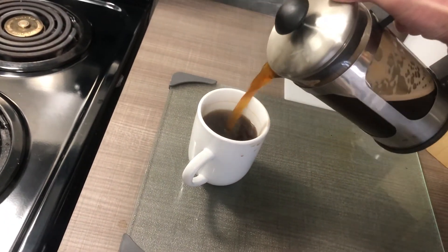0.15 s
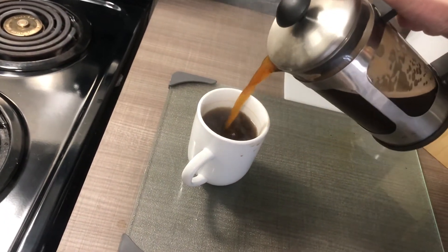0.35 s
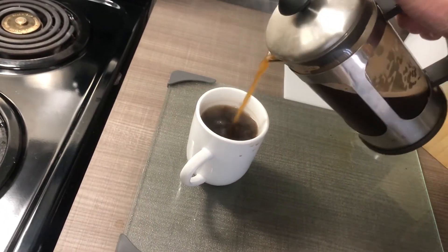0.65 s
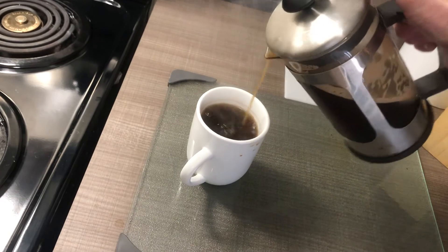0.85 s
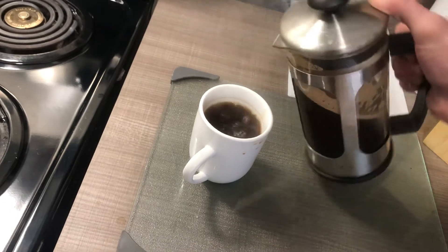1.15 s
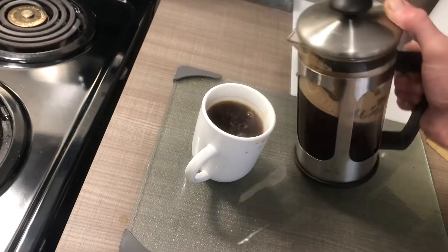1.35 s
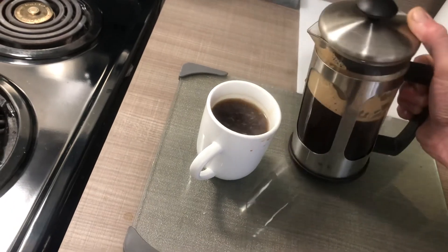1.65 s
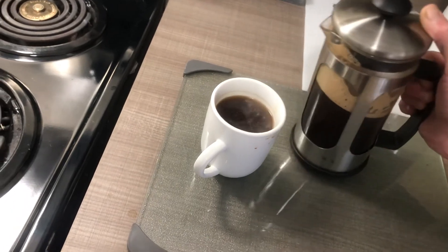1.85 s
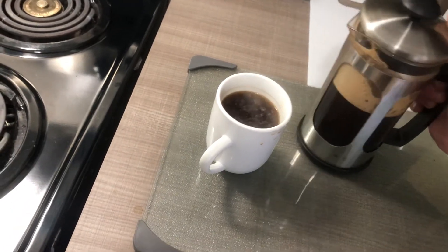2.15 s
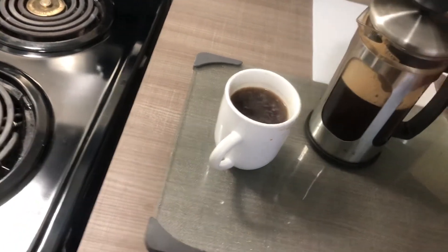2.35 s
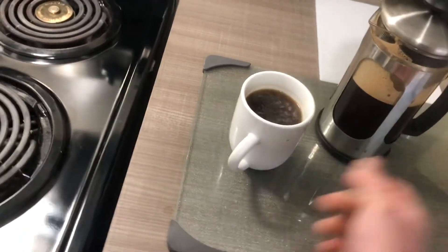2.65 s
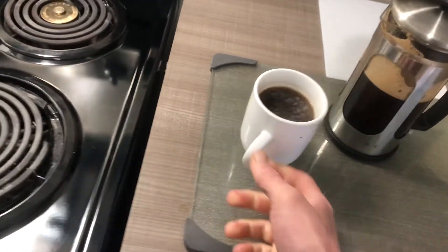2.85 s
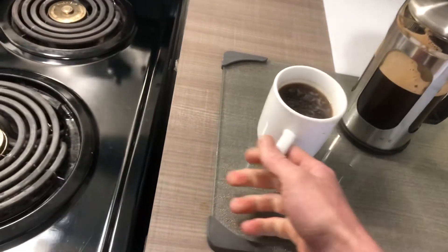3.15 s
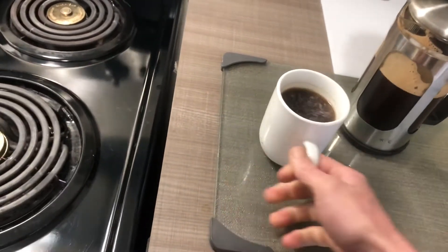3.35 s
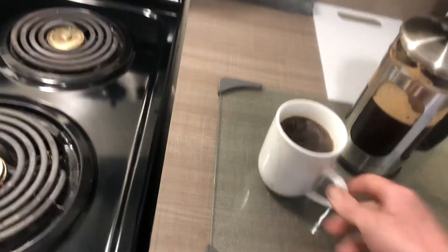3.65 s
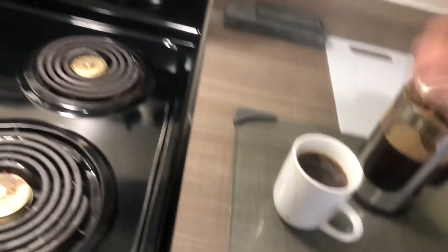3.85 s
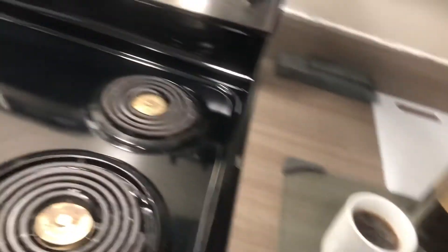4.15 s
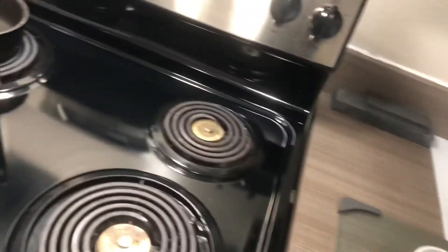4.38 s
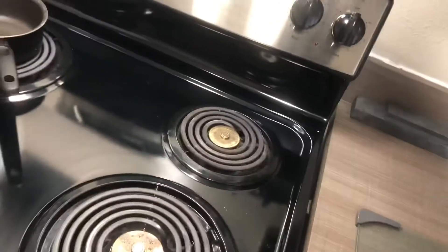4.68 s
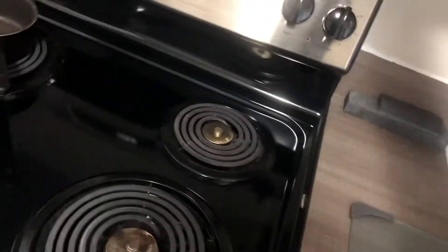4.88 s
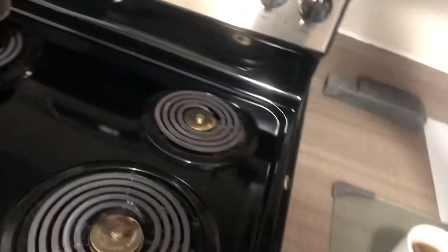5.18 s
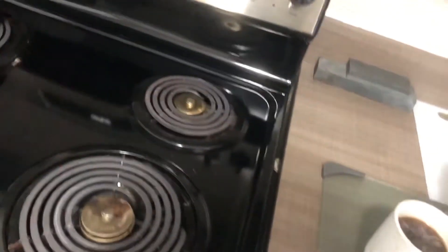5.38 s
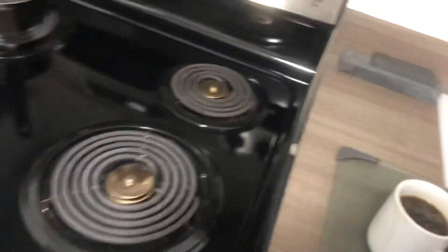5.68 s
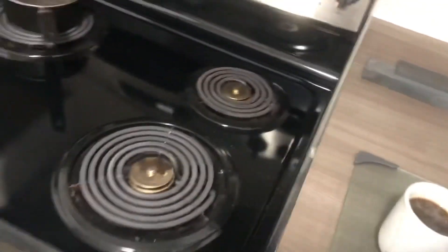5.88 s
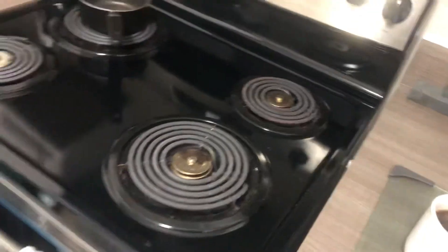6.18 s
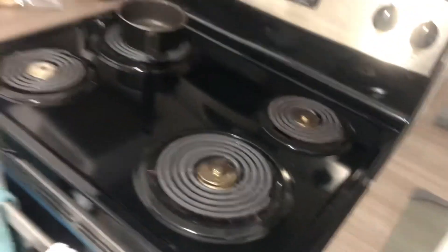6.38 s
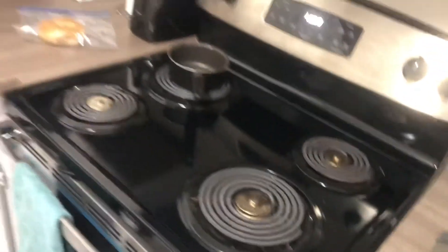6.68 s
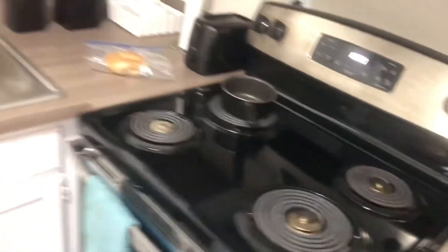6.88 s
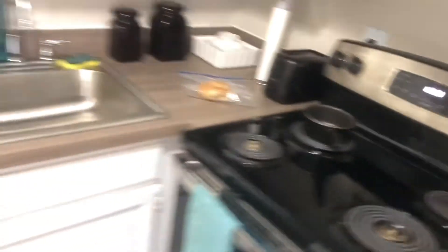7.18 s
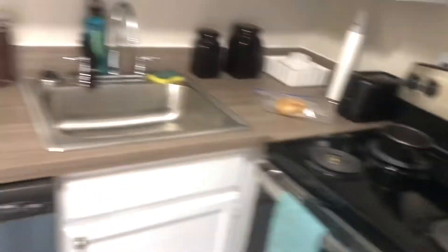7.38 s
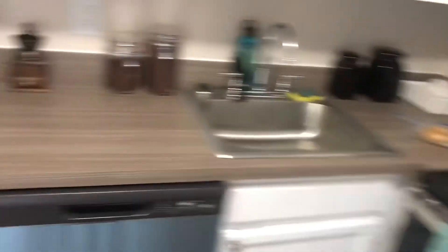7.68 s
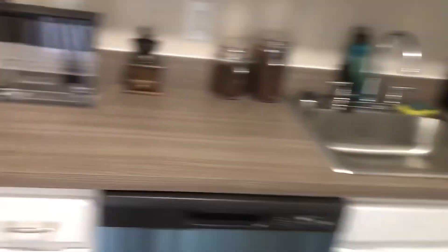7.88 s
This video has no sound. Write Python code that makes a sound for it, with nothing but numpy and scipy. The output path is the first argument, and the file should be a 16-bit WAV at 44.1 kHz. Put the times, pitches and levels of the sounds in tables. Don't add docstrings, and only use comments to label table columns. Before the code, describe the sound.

Coffee trickles and fizzes into a china mug, a heavy pot rocks onto glass, then small creaks, one sharp slap and two dull thuds.

```python
import sys
import numpy as np
from scipy import signal
from scipy.io import wavfile

SR = 44100
rng = np.random.default_rng(int(sys.argv[2]) if len(sys.argv) > 2 else 0)


def volts(x):
    e = np.asarray(x, float) / 20
    return 10 ** e


def log_audio(samples):
    frames = np.atleast_2d(samples).T
    limited = np.clip(frames, -1, 1)
    pcm = np.round(limited * 32767).astype(np.int16)
    wavfile.write(sys.argv[1], SR, pcm)


N = 354123

# time in seconds, level in dB.
HUM = [(0, -60.5), (1.4, -59.5), (3, -61), (5, -62), (6.2, -63.5), (6.6, -68.5), (7.1, -67), (7.5, -72),
       (8.03, -86)]
# frequency in Hz, density in dB per Hz.
AIR = [(12, -49), (20, -21.5), (69, -4), (96, -5.5), (124, -8), (169, -6), (314, -13), (416, -12),
       (863, -21), (2120, -25.5), (2810, -31.5), (3830, -29), (10800, -36), (15200, -37), (16500, -54)]
BAND_EDGES_HZ = 20 * 2 ** np.arange(0, 10.5, .5)
# frequency in Hz, t60 in seconds.
KITCHEN_DECAY = [(100, 0.54), (300, 0.6), (800, 0.6), (2000, 0.48), (5000, 0.47), (9000, 0.28),
                 (14000, 0.089)]

# strongest at in seconds, swell in seconds, fade in seconds,
# lift over the air in dB, tilt in dB per octave.
MOVES = [(.835, 0.022, 0.1, 16.5, 0.5), (1.05, 1.2, 0.22, -21, 15.5), (2.0, 0.11, 0.033, -10, -2),
         (2.25, 0.14, 0.11, 8.5, 1.5), (3.29, 0.18, 0.15, 5.5, -0.5), (3.9, 0.093, 0.35, -2, -2),
         (4.1, 0.26, 0.25, 4.5, 4), (4.25, 0.18, 0.1, -19, -8), (4.55, 0.096, 0.36, 2.5, -3),
         (4.9, 0.14, 0.1, 15.5, 1.5), (5.05, 0.15, 0.14, 2, 3), (5.3, 0.68, 0.21, 3.5, 0),
         (5.82, 0.35, 0.52, 3.5, -1), (6.02, 0.19, 0.042, 3, -1), (6.38, 0.098, 0.19, 13, 1),
         (6.62, 0.19, 0.11, 10.5, 4.5), (6.96, 0.48, 0.15, 3.5, 0.5), (7.16, 0.23, 0.11, 9.5, 0.5),
         (7.36, 0.064, 0.13, 14, 1), (7.62, 0.024, 0.31, 9, -1.5), (7.698, 0.029, 0.071, 21, 5.5),
         (7.82, 0.34, 0.13, 15.5, 3), (7.96, 0.08, .2, 10, -1.5)]
MOVE_CENTRE_HZ, MOVE_BEND_DB = 2000, 1.04

# start in seconds, peak in dB, tilt in dB per octave,
# contact t60 in seconds, echoes in dB.
STEPS = [(2.05, -51.5, 6, 0.063, -1), (3.639, -45.5, 5, 0.1, -25), (4.385, -40.5, 1, 0.093, -0.5),
         (4.394, -38.5, -0.5, 0.18, 10), (5.606, -46, -5, 0.036, -20), (5.863, -47.5, 7, 0.071, 13),
         (6.298, -44.5, 4, 0.044, -21), (6.352, -50, 3, 0.065, -15), (7.12, -40, 11, 0.022, -10),
         (7.13, -37, -4.5, 0.023, -17.5), (7.259, -34.5, -2, 0.0058, -56), (7.317, -41.5, -4, 0.14, -13),
         (7.9, -43, -0.5, 0.67, 4), (7.92, -48, -1, 0.24, -4), (6.91, -45.5, -14.5, 0.048, -19)]
# frequency in Hz, density in dB per Hz.
STEP_COLOUR = [(60, -11), (260, -3), (400, -5.5), (750, -4), (1200, -9.5), (3600, -22), (6200, -28),
               (15000, -45.5)]
# start in seconds, peak in dB.
HEELS = [
    (7.131, -42),
    (7.318, -53),
]

# start in seconds, peak in dB, pitch in Hz, t60 in seconds.
PINGS = [(1.157, -63.5, 3050, 0.043), (2.733, -50.5, 4340, 0.17), (2.762, -52.5, 2590, 0.11),
         (2.979, -52, 7440, 0.14), (3.64, -47, 2450, 0.023), (3.902, -51.5, 2100, 0.13),
         (3.936, -51.5, 5680, 0.12), (3.998, -55, 2300, 0.032), (4.41, -48.5, 6040, 0.086),
         (4.457, -49, 3990, 0.094), (4.885, -46, 2000, 0.16), (5.461, -55.5, 1590, 0.14),
         (5.638, -48.5, 1660, 0.15), (5.642, -52, 1900, 0.53), (5.72, -55.5, 1874, 0.65),
         (5.866, -57, 2500, 0.04), (6.22, -56, 2300, 0.096), (6.68, -51, 2570, 0.028),
         (6.826, -49, 2790, 0.081)]
# start in seconds, peak in dB, centre in Hz.
TICKS = [(2.1797, -41, 3560), (2.215, -62, 5000), (2.26, -55, 5000), (2.308, -53, 3870), (2.336, -57, 5000),
         (2.7263, -49, 4170), (2.9784, -53, 7700), (3.124, -53.5, 3900), (3.187, -54, 3900),
         (3.218, -57, 5400), (3.218, -67, 10000), (3.323, -57, 3700), (4.388, -58, 14000),
         (4.409, -51, 11000), (4.456, -58, 11000), (6.442, -50, 5200), (3.6376, -63, 6400),
         (3.647, -43.5, 3980), (3.652, -65, 5450), (3.892, -56, 7840), (3.934, -51, 5640),
         (5.221, -50, 5800), (5.3762, -57, 13500), (5.381, -55, 4780), (5.5218, -62, 14000),
         (5.7019, -64, 5520), (5.8626, -53, 5600), (6.169, -53, 5260), (6.222, -52, 7660),
         (6.246, -46.5, 4500), (6.455, -50, 4470), (6.873, -58, 6530), (8.0207, -45.5, 4900)]
TICK_T60_S = 0.051
# strongest at in seconds, swell in seconds, fade in seconds,
# level in dB.
MUG_JERKS = [
    (3.125, 0.0084, 0.074, -71),
    (3.225, 0.013, 0.029, -59.5),
    (3.27, 0.017, 0.017, -67),
    (3.315, 0.032, 0.03, -62.5),
    (3.5, 0.19, 0.072, -75),
    (5.06, 0.012, 0.063, -67),
]
# frequency in Hz, width in Hz, level in dB.
CHINA = [(2230, 23, 0), (2580, 50, 5.5), (3300, 56, 3), (3850, 52, 9), (4450, 38, 5), (4800, 70, -7),
         (5370, 59, 6), (6100, 90, -14), (7060, 46, -22), (7700, 76, -7), (10000, 150, -26)]

# start in seconds, peak in dB, tilt in dB per octave, contact t60 in seconds, echoes in dB.
SLAP = [
    (4.6855, -13, 2, 0.075, -7.5),
    (4.704, -28.5, -4.5, 0.078, -14),
]
# frequency in Hz, density in dB per Hz.
SLAP_COLOUR = [(35, -52), (60, -33), (252, -6), (486, -22), (983, 3.5), (1080, -18), (1330, -5),
               (2520, -12), (3420, -13.5), (14700, -23.5), (16500, -34)]
# frequency in Hz, level in dB, t60 in seconds.
SLAPPED_MODES = [(257, -5.5, 0.34), (544, -7, 0.32), (748, -10, .3), (983, 8.5, 0.17), (1745, 2, 0.25),
                 (1314, 2, 0.36), (2013, 11, 0.066)]
# start in seconds, peak in dB, tilt in dB per octave,
# contact t60 in seconds, echoes in dB.
THUDS = [
    (6.3932, -22, -0.5, 0.019, -23.5),
    (6.4512, -24.5, -0.5, 0.011, -30),
]
# frequency in Hz, density in dB per Hz.
THUD_COLOUR = [(29, -44), (50, -22), (85, 7), (313, -7.5), (520, 0), (586, -24), (842, 2), (1100, -17),
               (1580, -7), (2880, -25), (4600, -33), (16000, -82)]
# frequency in Hz, level in dB, t60 in seconds.
PANEL_MODES = [(85, -4.5, 0.23), (138.6, -9, 0.18), (182.4, -2.5, 0.21), (299, -18, 0.17), (486, -7.5, 0.4),
               (517, -1, 0.23), (811, -2, 0.3), (1284, -8, .15), (4600, -20, 0.045), (891.6, -1.5, 0.27),
               (972, 2, 0.097), (1593, 2.5, 0.052), (2100, -7, 0.057), (3120, -14, 0.065)]

# start in seconds, peak in dB, tilt in dB per octave,
# contact t60 in seconds, echoes in dB.
KNOCKS = [
    (1.4815, -13.5, -3, 0.042, -20),
    (1.6455, -19, -7.5, 0.058, -20.5),
    (1.7025, -25.5, -10.5, 0.033, -24.5),
    (2.13, -21.5, -9, 0.046, -15.5),
]
# start in seconds, peak in dB, tilt in dB per octave,
# contact t60 in seconds, echoes in dB.
REBOUNDS = [
    (1.4864, -20.5, -3, .02, -24),
    (1.495, -25.5, 0, 0.034, -25),
    (1.661, -41, 1, .03, -36),
    (2.137, -35.5, 4.5, 0.036, -39),
]
# frequency in Hz, density in dB per Hz.
KNOCK_COLOUR = [(35, -48.5), (90, -39), (153, -13), (250, -22.5), (408, -9.5), (579, -13.5), (666, -7.5),
                (1090, -4), (1310, -14), (1600, -0.5), (2200, -7.5), (3850, -17), (16000, -44.5)]
# frequency in Hz, level in dB, t60 in seconds.
BOARD_MODES = [(627, -5.5, 0.26), (704, -7.5, .2), (1127, -0.5, .2), (898, 0.5, 0.18), (1073, -3, 0.083),
               (1408, 9.5, 0.083), (1550, 12.5, 0.039), (2000, -14, 0.037)]
# frequency in Hz, level in dB, t60 in seconds.
COUNTER_MODES = [(166, 2, 0.1), (317, -8, 0.22), (398.8, -3, 0.21)]
# frequency in Hz, level in dB, t60 in seconds.
SETTLING_MODES = [(198, -1.5, 0.1), (403, -6.5, 0.11), (1390, -2.5, 0.055), (888, -4, 0.08)]
STRIKE_SPREAD_DB = 1.2

# time in seconds, force in dB.
STREAM = [(0, -60.5), (.2, -71), (.4, -66), (.55, -69), (.75, -52.5), (.9, -66.5), (1.0, -107), (1.6, -130)]
# frequency in Hz, width in Hz, level in dB.
MUG = [(424, 28, -11), (1370, 210, -6), (1770, 200, 2.5), (2300, 290, -4)]
# strongest at in seconds, swell in seconds, fade in seconds, level in dB.
GLUGS = [
    (.03, 0.035, 0.024, -57),
    (.24, 0.066, 0.027, -64.5),
    (.37, 0.046, 0.036, -59.5),
    (.63, 0.031, 0.035, -57.5),
    (.82, 0.073, 0.05, -52),
]
# start in seconds, peak in dB, pitch in Hz.
BUBBLES = [(0.0034, -34.5, 1370), (.045, -47, 2300), (.069, -49, 1750), (.113, -50, 1590),
           (.392, -50, 1770), (.482, -50, 1870), (0.701, -39, 2250), (.643, -44, 2300), (0.1364, -46, 2330),
           (0.145, -46, 2350), (0.179, -43, 1770), (0.191, -44, 2330), (0.2148, -43, 1480),
           (0.2464, -43, 2100), (0.258, -33, 1666), (0.319, -43.5, 2300), (0.3496, -34, 1770),
           (0.553, -49, 2440), (0.5755, -38, 2300), (0.608, -28.5, 1504), (0.681, -36, 2300),
           (0.729, -29, 1506), (0.7615, -27, 1950), (0.797, -26.5, 1620), (0.823, -23.5, 1370),
           (0.892, -40, 1315)]
# start in seconds, peak in dB, centre in Hz.
DROPS = [(0.0034, -25.5, 12900), (.0195, -42, 7950), (.1035, -48, 13000), (0.1531, -46, 14000),
         (.161, -44, 14500), (0.174, -40, 13500), (.189, -53, 10000), (.1975, -45, 13500),
         (.208, -47, 8500), (.2155, -36, 14000), (.241, -45, 10500), (.2455, -38, 13400),
         (.264, -43, 13600), (.2885, -43, 8460), (.301, -41, 8000), (.3282, -35, 14100), (.350, -43, 7500),
         (.367, -47, 11000), (.374, -48, 7900), (.4465, -59, 12500), (.4525, -52, 7400),
         (.4975, -51, 14000), (.558, -47, 13000), (.709, -37, 10500), (.855, -44, 10000),
         (0.932, -45, 8500), (.985, -49, 14500), (1.067, -47, 6300), (1.374, -54, 12000),
         (0.2164, -34, 8600), (0.2508, -33, 14400), (0.2915, -35, 14200), (0.3006, -37, 14000),
         (0.331, -38, 8400), (0.349, -36, 13900), (0.527, -39, 14800), (0.608, -43.5, 6740),
         (0.6733, -37, 14200), (0.7032, -32, 7400), (0.755, -36, 5500), (0.772, -36, 11600),
         (0.793, -30, 10300), (0.8236, -19.5, 10700), (0.8239, -19, 3970), (.8395, -38, 11000),
         (0.8636, -30.5, 11200), (0.8937, -18, 9700), (0.9374, -32, 12400), (1.051, -35, 13700),
         (1.066, -34, 12600), (1.127, -40, 14300), (1.2274, -41, 13300), (1.268, -42, 9200),
         (1.311, -42, 15000), (1.4157, -45, 9500), (1.46, -47, 7800)]
# start in seconds, peak in dB, centre in Hz, t60 in seconds.
SPRAY = [
    (.658, -54, 5770, 0.14),
    (.704, -47, 7400, 0.24),
    (.756, -43, 5500, 0.098),
    (.824, -38.5, 4600, 0.23),
    (.894, -45.5, 4560, 0.39),
    (.005, -52, 3650, 0.17),
]
SMALL_BUBBLES_PER_S, FOAM_TICKS_PER_S = 200, 140
FOAM_DB, FOAM_FOLLOWS, FOAM_SETTLES_DB_PER_S, FOAM_GONE_S = -70, 0.41, 21, 1.7
BUBBLE_T60_S, BUBBLE_KNEE_HZ = 0.055, 2300
DRIPS_DB, DRIPS_SPREAD_DB = 11.5, 3
DRIPS_LOW_HZ, DRIPS_HIGH_HZ, DRIPS_END_S = 1000, 2570, .93
DROP_T60_S = .014

POUR_ROOM_DB, POT_ROOM_DB, PANEL_ROOM_DB, SMALL_ROOM_DB = -16, -12.5, -10.5, -11


def rms_one(x):
    return x / np.sqrt(np.mean(x ** 2) + 1e-20)


def in_time(rows):
    s, *columns = np.transpose(rows)
    return [np.interp(np.arange(N) / SR, s, c) for c in columns]


def at_hz(points, hz):
    point_hz, value = np.array(points).T
    return np.interp(np.log(hz), np.log(point_hz), value)


def band(x, low_hz, high_hz):
    edges_hz = [low_hz, min(high_hz, .45 * SR)]
    return signal.sosfilt(signal.butter(2, edges_hz, "band", fs=SR, output="sos"), x)


def drift(rate_hz):
    r = np.exp(-80 * np.pi * rate_hz / SR)
    noise = rng.standard_normal(N // 40 + 2002)
    slow = signal.lfilter([1], [1, -2 * r, r * r], noise)[2000:]
    return np.interp(np.arange(N) / 40, np.arange(len(slow)), rms_one(slow))


def ring(x, hz, t60_s):
    r, w = volts(-60 / (t60_s * SR)), 2 * np.pi * hz / SR
    return signal.lfilter([0, np.sin(w)], [1, -2 * r * np.cos(w), r * r], x + 1e-18)


def add(out, s, db, sound):
    i = round(s * SR)
    out[i:i + len(sound)] += (volts(db) * sound / np.abs(sound).max())[:N - i]


def dying(t60_s, size=16384):
    return rng.standard_normal(size) * volts(-60 * np.arange(size) / SR / max(t60_s, .001))


def swells(rows, gains):
    t = np.arange(0, N + 64, 64) / SR
    bells = []
    for s, up_s, down_s, *_ in rows:
        width_s = np.where(t < s, max(up_s, .003), max(down_s, .003))
        bells.append(np.exp(-2 * ((t - s) / width_s) ** 2))
    return [np.interp(np.arange(N) / SR, t, power) for power in gains ** 2 @ np.array(bells)]


def grains(per_s, spread_db):
    out, at = np.zeros(N), np.flatnonzero(rng.random(N) < per_s / SR)
    size, sign = rng.random((len(at), 2)).T
    out[at] = volts(spread_db * np.minimum(-np.log(size + 1e-9), 4)) * np.sign(sign - .5)
    return out


def tones(table, rise, rough, size=8192):
    out, t, table = np.zeros(N), np.arange(size) / SR, list(table)
    flutters = band(rng.standard_normal((len(table), size)), 40, 190)
    for (s, db, hz, t60_s), flutter in zip(table, flutters):
        sine = np.sin(2 * np.pi * hz * (t + rise * t ** 2))
        add(out, s, db, (1 + rough * rms_one(flutter)) * sine * volts(-60 * t / t60_s))
    return out


def ticks(table, octaves, snap=0.0, size=4096):
    out, click = np.zeros(N), np.arange(size) == 0
    for s, db, hz, t60_s in table:
        burst = dying(t60_s, size=size) + snap * click
        add(out, s, db, band(burst, hz / 2 ** octaves, hz * 2 ** octaves))
    return out


def noise_bands():
    white = rng.standard_normal((2, N))
    pairs = zip(BAND_EDGES_HZ, BAND_EDGES_HZ[1:])
    return [(min(np.sqrt(a * b), 15000), band(white[k % 2], a, b)) for k, (a, b) in enumerate(pairs)]


def kitchen(x):
    t, edges_hz = np.arange(SR) / SR, 60 * 2 ** np.arange(0, 8.6, .5)
    echoes = np.zeros(SR)
    for a, b in zip(edges_hz, edges_hz[1:]):
        t60_s = at_hz(KITCHEN_DECAY, np.sqrt(a * b))
        echoes += band(rng.standard_normal(SR), a, b) * volts(-60 * t / t60_s)
    echoes = echoes * (1 - np.exp(-(t / 0.0046) ** 2))
    return signal.fftconvolve(x, echoes / np.sqrt(np.sum(echoes ** 2)))[:N]


def fridge_hum():
    level_db, = in_time(HUM)
    turns = np.cumsum(120.9 + 0.43 * drift(2.74)) / SR
    return np.sqrt(2) * volts(level_db + 2.5 * drift(2.9)) * np.sin(2 * np.pi * turns)


def air_and_movement(bands, air_db, patchy_db, handling_db):
    *_, lift_db, tilt_db = np.transpose(MOVES)
    octaves = np.log2([[hz / MOVE_CENTRE_HZ] for hz, _ in bands])
    motion = swells(MOVES, volts(lift_db + tilt_db * octaves - MOVE_BEND_DB * octaves ** 2))
    out, hand = np.zeros(N), drift(3.1)
    for (hz, noise), lift in zip(bands, motion):
        level_db = air_db + at_hz(AIR, hz) + patchy_db * drift(36) + handling_db * hand * (hz < 200)
        out += volts(level_db) * np.sqrt(1 + lift) * noise
    return out


def blows(hits, colour, bands, rise_turns):
    out, t, bands = np.zeros(N), np.arange(SR // 2) / SR, bands[3:]
    hz = np.array([[hz] for hz, _ in bands])
    rise = 1 - np.exp(-(t * hz / rise_turns) ** 2)
    echoes = volts(-60 * t / at_hz(KITCHEN_DECAY, hz))
    for s, db, tilt_db, t60_s, echoes_db in hits:
        noise = np.array([np.resize(v[round(s * SR):][:len(t)], len(t)) for _, v in bands])
        fall = volts(-60 * t / max(t60_s, .002)) + volts(echoes_db) * echoes
        gain = volts(at_hz(colour, hz) + tilt_db * np.log2(hz / 1000))
        add(out, s, db, np.sum(gain * rise * fall * noise, axis=0))
    return out


def struck(hits, modes, body_db, late_turns, rattle, low_hz=65):
    out, n = np.zeros(N), np.arange(16384)
    for s, db, *_ in hits:
        strength_db = rng.normal(0, STRIKE_SPREAD_DB, len(modes))
        body = []
        for (hz, level_db, t60_s), change_db in zip(modes, strength_db):
            push = np.exp(-(n * hz / SR - late_turns) ** 2 * 20) * hz
            body.append(volts(level_db + change_db) * ring(push, hz, t60_s))
        flutter = 1 + rattle * rms_one(band(rng.standard_normal((len(modes), len(n))), 10.0, 50))
        add(out, s, db + body_db, band(np.sum(flutter * body, axis=0), low_hz, 9800))
    return out


def turned_mug(slips_per_s):
    slips = grains(slips_per_s, 3.4)
    power, = swells(MUG_JERKS, volts(np.array(MUG_JERKS)[None, :, -1]))
    china = sum(volts(db) * rms_one(ring(slips, hz, .5 / width_hz)) for hz, width_hz, db in CHINA)
    return np.sqrt(power) * rms_one(china)


def creaks_and_ticks():
    pings = volts(-5) * tones(PINGS, rise=0.054, rough=0.91) + ticks(PINGS, octaves=0.063)
    dry_ticks = ticks([(*row, TICK_T60_S) for row in TICKS], octaves=0.74)
    return pings + dry_ticks + turned_mug(slips_per_s=430)


def hollow_panels():
    thuds = struck(THUDS, PANEL_MODES, late_turns=1.595, rattle=0.54, body_db=-1.0)
    heels = struck(HEELS, PANEL_MODES, late_turns=1.7, rattle=0.98, body_db=-10.0)
    slap = struck(SLAP, SLAPPED_MODES, late_turns=3.09, rattle=0.6, body_db=-7.5)
    return thuds + heels + slap


def pot_on_board():
    rocking = KNOCKS[:3]
    board = struck(rocking + REBOUNDS[1:2], BOARD_MODES, late_turns=1.61, rattle=0.71, body_db=-3.0, low_hz=400)
    counter = struck(rocking, COUNTER_MODES, late_turns=2.385, rattle=0.2, body_db=-9, low_hz=110)
    landing = struck(KNOCKS[3:], SETTLING_MODES, late_turns=1.755, rattle=0.72, body_db=-4, low_hz=120)
    return board + counter + landing


def stream():
    force_db, = in_time(STREAM)
    t = np.arange(N) / SR
    settled_db = FOAM_SETTLES_DB_PER_S * t
    held_db = np.maximum.accumulate(FOAM_FOLLOWS * (force_db + 60) + settled_db) - settled_db
    mug, foam = np.zeros(N), np.zeros(N)
    for hz, width_hz, db in MUG:
        mug += volts(db) * rms_one(ring(grains(SMALL_BUBBLES_PER_S, 2.7), hz, 2.6 / width_hz))
    for hz in np.geomspace(7000, 15000, num=5):
        foam += rms_one(ring(grains(FOAM_TICKS_PER_S / 4, 1.2), hz, 18.0 / hz))
    return volts(force_db) * rms_one(mug) + volts(FOAM_DB + held_db) * (t < FOAM_GONE_S) * rms_one(foam)


def small_bubbles(count):
    when, pitch, size = rng.random((count, 3)).T
    s = when * DRIPS_END_S
    hz = DRIPS_LOW_HZ * (DRIPS_HIGH_HZ / DRIPS_LOW_HZ) ** pitch
    db = np.interp(s, *np.transpose(STREAM)) + DRIPS_DB - DRIPS_SPREAD_DB * 4 * size
    return tones(zip(s, db, hz, 46.0 / hz), rise=3.3, rough=1.0, size=3072)


def glugs(hz, t60_s):
    power, = swells(GLUGS, volts(np.array(GLUGS)[None, :, -1]))
    hummed = ring(ring(rng.standard_normal(N), hz, t60_s), hz, t60_s)
    return np.sqrt(power) * rms_one(hummed)


def coffee_pour():
    bubbles = [(s, db, hz, BUBBLE_T60_S / (1 + (hz / BUBBLE_KNEE_HZ) ** 11.0)) for s, db, hz in BUBBLES]
    chirps = tones(bubbles, rise=2.75, rough=1.0)
    splash = ticks(bubbles, octaves=0.47, snap=14.0)
    gulp = glugs(hz=421.5, t60_s=0.035) + volts(-52.0) * ring(splash, 1070, 0.22)
    spray = ticks(SPRAY, octaves=0.36, size=16384)
    drops = ticks([(*row, DROP_T60_S) for row in DROPS], octaves=0.46, snap=6.5)
    water = stream() + small_bubbles(count=110) + volts(-5.0) * chirps + volts(-6.0) * splash
    return water + gulp + spray + drops


def scene():
    shaken = noise_bands()
    reversed_bands = [(hz, noise[::-1]) for hz, noise in shaken]
    air = air_and_movement(reversed_bands, air_db=-39.5, patchy_db=1.62, handling_db=2.5) + fridge_hum()
    far = blows(SLAP, SLAP_COLOUR, shaken, rise_turns=4.7) + blows(STEPS, STEP_COLOUR, shaken, rise_turns=1.85)
    hits = blows(KNOCKS + REBOUNDS, KNOCK_COLOUR, shaken, rise_turns=0.91)
    hits = hits + blows(THUDS, THUD_COLOUR, shaken, rise_turns=2.1)
    small, panel, pot, pour = creaks_and_ticks(), hollow_panels(), pot_on_board(), coffee_pour()
    wet = volts(POUR_ROOM_DB) * pour + volts(POT_ROOM_DB) * pot
    wet = wet + volts(PANEL_ROOM_DB) * panel + volts(SMALL_ROOM_DB) * small
    return (pour + pot + panel + small + kitchen(wet) + hits + far + air)[None]


def band_limit(x):
    return signal.sosfilt(signal.butter(12, 16820, fs=SR, output="sos"), x)


def record(dry):
    cut = signal.sosfilt(signal.ellip(10, .5, 42, 15780, fs=SR, output="sos"), dry)
    return band_limit(cut)


dry = scene()
out = record(dry)
log_audio(out)
```